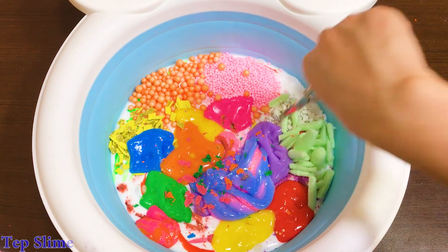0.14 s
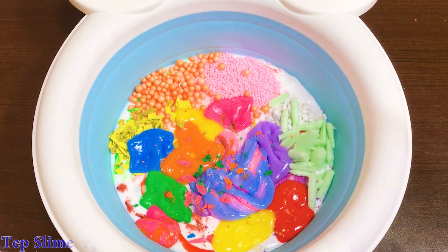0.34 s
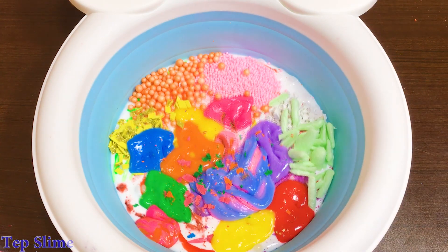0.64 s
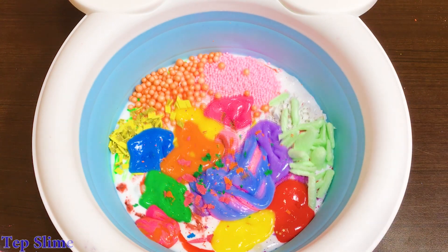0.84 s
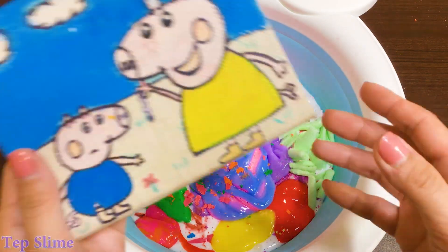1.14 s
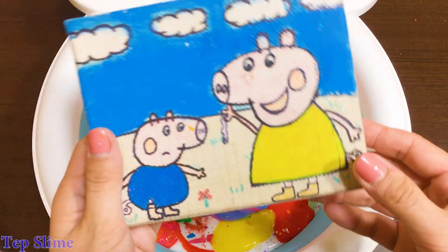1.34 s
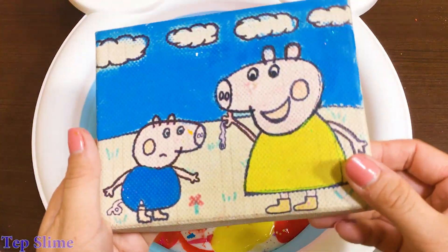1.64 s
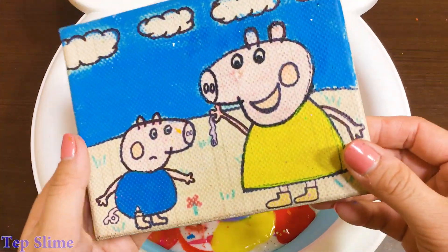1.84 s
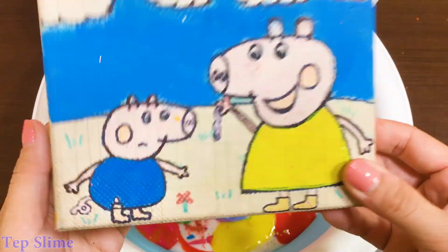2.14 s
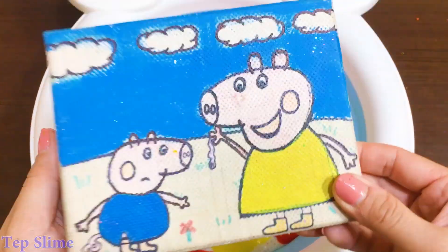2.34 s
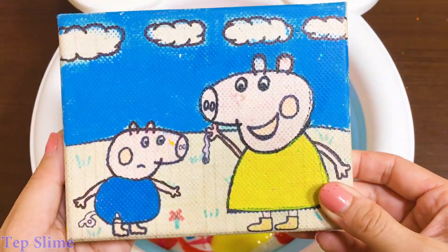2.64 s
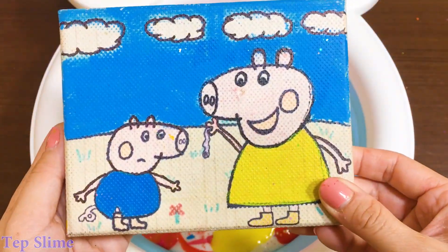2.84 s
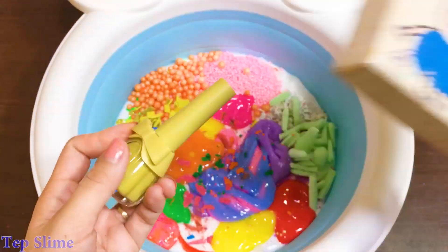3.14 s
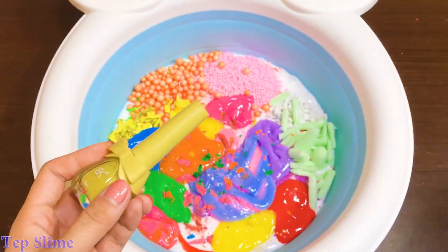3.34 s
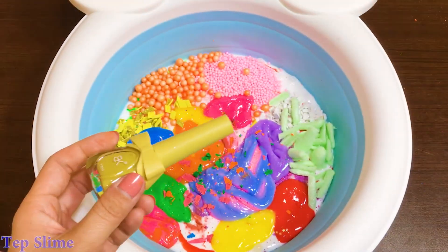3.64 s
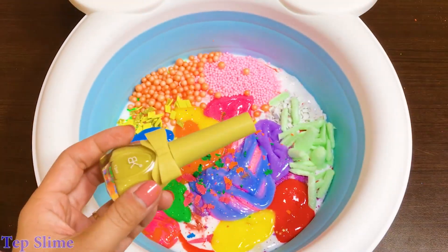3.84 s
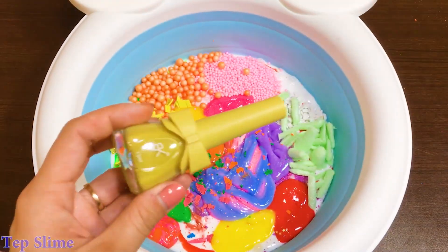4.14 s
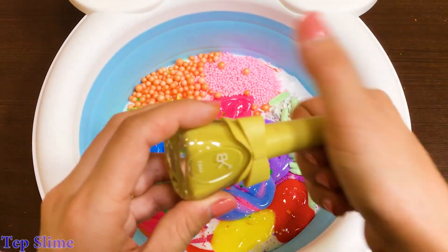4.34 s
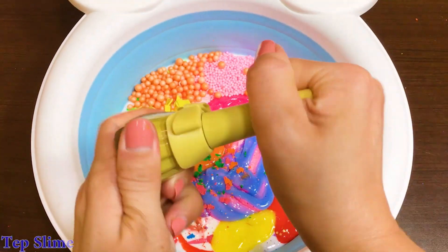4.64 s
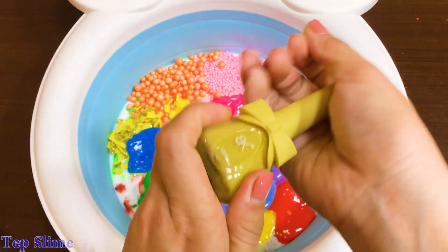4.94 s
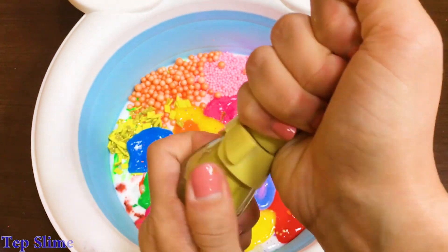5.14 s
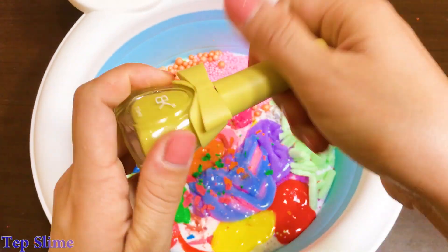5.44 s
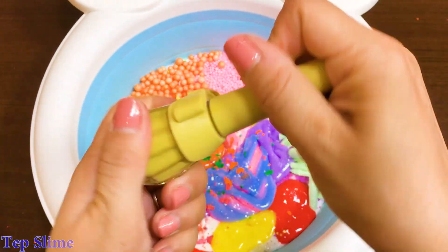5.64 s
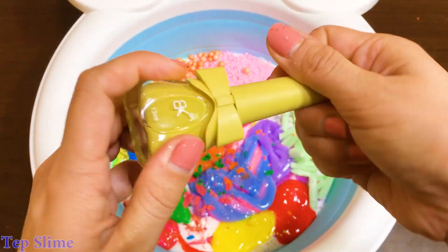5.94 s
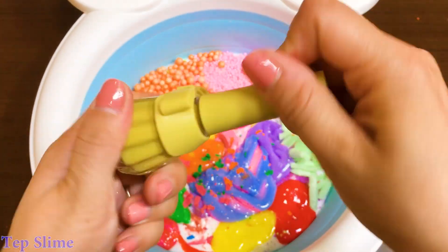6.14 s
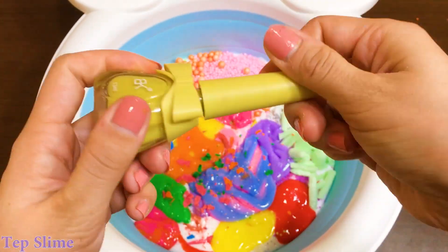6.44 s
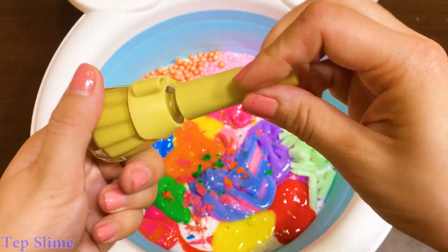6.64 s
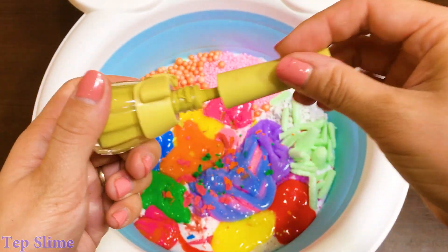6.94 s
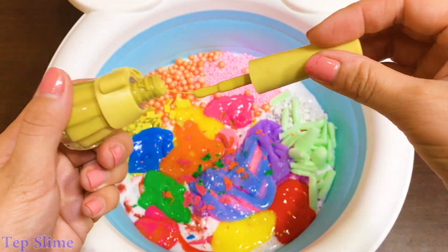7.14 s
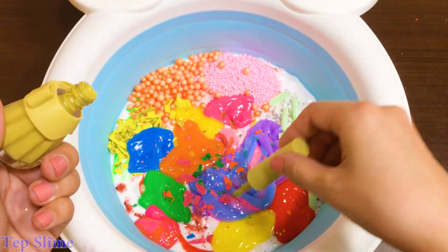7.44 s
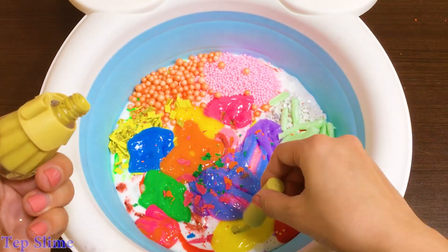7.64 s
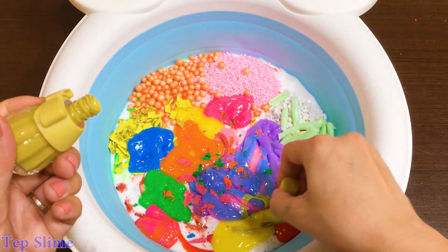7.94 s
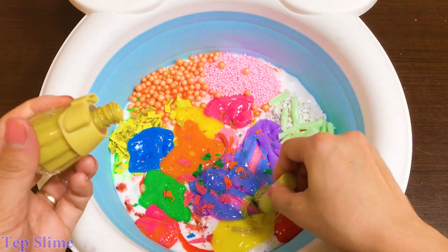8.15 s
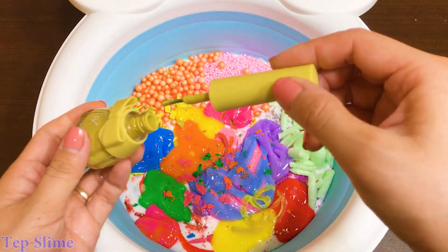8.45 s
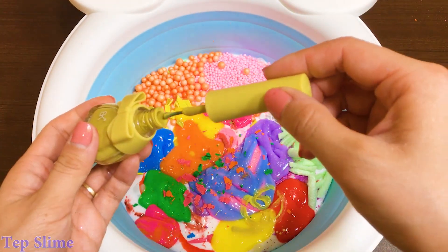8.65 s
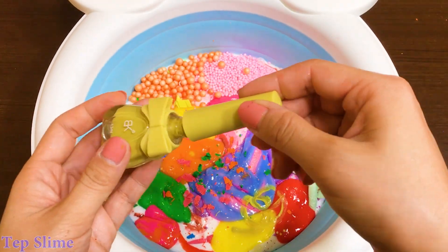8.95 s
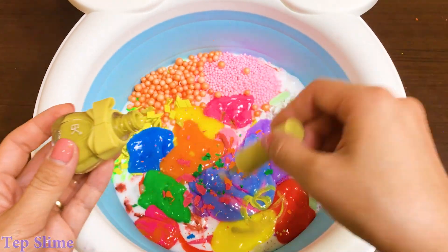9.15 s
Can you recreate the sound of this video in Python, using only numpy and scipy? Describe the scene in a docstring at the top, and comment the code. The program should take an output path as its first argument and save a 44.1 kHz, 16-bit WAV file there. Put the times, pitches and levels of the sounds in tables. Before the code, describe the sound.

In a quiet room with low hum, microphone hiss and muffled thuds from elsewhere in the house, small things are handled up close. First come faint scissor clicks, then the scuffing and tapping of a cardboard box, peaking in two sharp hollow knocks. Soft, squeaky finger friction follows as a little bottle's cap is twisted, with a few tiny ticks and finally a quick run of hard clicks.

```python
"""Close to a microphone, small scissors click: short rough rings. From 1.7 s a hollow cardboard box is turned,
rubbed and knocked: friction and blows excite its resonances, loudest near 2.7 and 2.9 s, where the blows also
boom low. From 4.8 s fingers slide on the cap of a small bottle, hissing and squeaking. At 9.2 s something small
clicks. Throughout, dull thuds come through the house over a low hum, rumble, a mid wash and microphone hiss."""
import sys
import numpy as np
from scipy import signal
from scipy.io import wavfile
from scipy.ndimage import uniform_filter1d

SR = 44100
rng = np.random.default_rng(int(sys.argv[2]) if len(sys.argv) > 2 else 0)


def to_wav(sig):
    """Store sig (one row per channel, or 1-D mono) as 16-bit WAV at the path in sys.argv[1].

    Samples outside -1..1 are clipped; the rate is SR.
    """
    pcm = np.clip(np.atleast_2d(sig), -1, 1) * 32767
    pcm = np.round(pcm).astype(np.int16)
    wavfile.write(sys.argv[1], SR, pcm.T)  # frames by channels


N = 410571

# hum level: time_s, level_db
HUM_LEVEL = [(0, -64), (.28, -78), (.36, -66.5), (1.32, -68.5), (1.5, -62), (1.62, -80), (1.8, -62),
             (2.09, -55.5), (2.2, -74), (2.38, -70), (2.44, -59.5), (2.75, -53), (3.03, -73.5), (3.47, -79),
             (3.56, -64), (3.86, -59), (4.3, -61), (4.37, -54.5), (4.58, -58.5), (4.77, -71), (5.05, -73),
             (5.11, -87), (5.2, -68), (5.41, -67.5), (5.55, -84), (5.76, -68), (6.15, -86), (6.25, -73),
             (7.11, -80), (7.52, -67.5), (8.13, -60.5), (8.6, -64), (8.68, -78), (8.9, -66.5), (9.31, -78)]
# hum pitch: time_s, pitch_hz
HUM_PITCH = [(0, 58.07), (4.6, 57.72), (5.8, 59.24), (7.4, 58.34), (7.6, 55.21), (9.31, 55.33)]
# noise spectra: freq_hz, density_db
RUMBLE_SPECTRUM = [(28, -27), (45, -7), (90, 1), (180, -1.5), (300, -3.5), (400, -7.5), (550, -22),
                   (900, -42.5)]
WASH_SPECTRUM = [(150, -26.5), (400, -3.5), (700, 1), (1200, -3), (2000, -4.5), (3500, -10.5), (6000, -22)]
HISS_SPECTRUM = [(1470, -31), (2500, -1), (2940, -8.5), (3510, -1), (4130, -1), (4930, 0), (5370, -4.5),
                 (6460, 0.5), (8330, -4.5), (10200, -2.5), (11600, -9.5), (12300, -6), (15100, -8.5),
                 (15800, -13)]
# noise levels: time_s, level_db
RUMBLE_LEVEL = [(0, -54.5), (.22, -65.5), (1.1, -69), (1.8, -65.5), (2.5, -60.5), (2.6, -64.5),
                (3.65, -60.5), (3.81, -66), (4.05, -54), (4.36, -71), (4.81, -64), (5.1, -78), (5.61, -79),
                (5.8, -68.5), (6.31, -71.5), (6.72, -78), (7.3, -74), (8.27, -71.5), (9.31, -69.5)]
WASH_LEVEL = [(0, -76.5), (.64, -71.5), (1.15, -67.5), (1.4, -62), (1.77, -68), (1.9, -69), (2.5, -73),
              (3.1, -73), (3.65, -64.5), (3.95, -72), (4.18, -63), (4.36, -69.5), (4.64, -63), (4.81, -75),
              (5.4, -80), (5.61, -73.5), (6.3, -83), (8.54, -82.5), (8.56, -74.5), (9.31, -75.5)]
HISS_LEVEL = [(0, -73), (.7, -71.5), (.72, -73.5), (4.64, -73), (4.65, -79), (8.545, -83), (8.555, -73.5),
              (9.31, -75.5)]
# small hard clicks: start_s, level_db, ring_hz, t60_s, crack_db
HARD_CLICKS = [(0.0273, -35.5, 10400, 0.0098, -3), (0.0596, -43.5, 2680, 0.012, -8),
               (.063, -39, 7700, 0.0056, -15), (.101, -54, 11000, .005, -8),
               (0.144, -48, 3960, 0.0067, -12), (.150, -51, 7100, 0.0049, 3), (.168, -57, 9000, .005, -6),
               (.187, -56, 11000, .005, -10), (0.35, -48, 9900, 0.0044, -13), (.371, -50, 9100, 0.0035, 2),
               (0.4292, -54, 10550, .02, -2), (0.452, -48.5, 1250, 0.04, -12), (.513, -55, 10900, .005, -8),
               (5.623, -54, 6000, 0.0036, -21), (6.984, -56, 9110, .004, -3.5),
               (6.995, -53.5, 4960, 0.0025, -4.5), (7.010, -49, 2383, 0.006, -16),
               (7.195, -61, 8200, .006, -1), (7.298, -55.5, 3340, 0.0096, -13.5),
               (7.310, -55, 10590, .005, -9), (8.093, -57, 2500, .005, -1),
               (8.2165, -49, 3000, 0.0023, -14), (9.168, -43.5, 603, 0.014, -7.5),
               (9.1719, -42, 6000, 0.018, -16), (9.206, -48, 1025, 0.025, -31.5),
               (9.2338, -31, 1770, 0.0062, 4), (9.239, -28, 2000, 0.0031, -14),
               (9.242, -20.5, 1620, 0.0019, -9), (9.245, -42, 8830, .006, 0), (9.248, -29, 5370, 0.0039, 1),
               (9.25, -21, 4930, 0.0074, -6), (9.2492, -34.5, 850, 0.015, -25),
               (9.253, -35.5, 5500, 0.004, -14)]
# fingers on smooth surfaces:
# full_s, rise_s, hold_s, fall_s, level_db, hiss_hz, focus (0-1), squeak_db, squeak_hz
FINGER_STROKES = [(0.034, 0.0056, .002, 0.13, -61.5, 8200, .35, -6, 2780),
                  (0.361, 0.016, .002, 0.046, -59, 9200, .05, -13, 3500),
                  (0.472, 0.094, .002, 0.035, -60, 7800, 0.1, 7.5, 3060),
                  (2.739, .004, .042, 0.011, -59, 7562, 0.2, 0, 2062),
                  (4.766, 0.055, 0.041, 0.028, -74, 8460, 0.52, 4.5, 2450),
                  (4.848, 0.048, 0.0019, 0.012, -55.5, 8650, 0.83, -14, 2130),
                  (5.08, .16, 0.031, 0.052, -65, 9000, .4, -8, 2010),
                  (5.216, .05, 0.079, 0.049, -71.5, 9140, 0.5, -9.5, 2406),
                  (5.409, 0.097, 0.066, .025, -63.5, 8180, 0.2, -10.5, 3100),
                  (5.497, 0.011, 0.015, 0.12, -57, 7900, 0.56, -18, 3500),
                  (5.623, 0.11, 0.0021, 0.064, -56, 6400, 0.44, -17, 3450),
                  (5.722, .05, 0.023, 0.02, -60.5, 10360, .15, -4, 3340),
                  (5.942, .025, .055, .11, -71.5, 8300, 0.37, -4, 2470),
                  (6.176, 0.081, 0.0019, .1, -66, 7510, 0.24, -8, 3395),
                  (6.247, .04, 0.077, .05, -68, 9750, .42, -24, 3300),
                  (6.657, .12, 0.0019, .045, -70, 7740, 0.18, -9, 3430),
                  (6.762, 0.14, 0.0095, 0.11, -70.5, 9620, 0.45, -25, 3307),
                  (7.006, 0.094, .002, .075, -67, 11040, 0.26, 4, 2620),
                  (7.087, 0.066, 0.023, .03, -78, 9200, .3, -14, 2900),
                  (7.309, 0.057, 0.0046, 0.019, -75, 10300, .4, 4, 3390),
                  (8.219, 0.0076, .002, 0.017, -65, 9280, 0.01, -3, 2530),
                  (8.575, 0.029, .002, 0.033, -64.5, 8490, 0.18, -9, 2785)]
# thuds through table and house, and at 2.73 and 2.912 s the low boom of the two big box knocks: start_s,
# level_db, boom_hz, rise_s, t60_s, rattle_db
THUDS = [(.035, -52, 228, 0.01, 0.41, -19), (.463, -46.5, 180, 0.0061, 0.14, -9),
         (.708, -46, 203.4, 0.0028, .33, -18.5), (1.397, -54, 254, 0.0097, .37, -8),
         (1.45, -55.5, 171.6, 0.01, 0.3, -23.5), (2.73, -40, 84.83, .004, .25, -14),
         (2.912, -42, 84.46, .004, .25, -7.5), (3.455, -42.5, 214, 0.022, 0.25, -18.5),
         (3.984, -40.5, 287.5, 0.0018, 0.45, -14.5), (4.239, -42, 117.3, 0.0029, .4, -16),
         (4.779, -56, 287.4, 0.0053, .37, -3.5), (5.559, -69.5, 330, 0.025, 1.26, -9),
         (5.817, -44.5, 283.5, 0.0014, 0.16, -10), (5.83, -46.5, 190.3, 0.012, 0.36, -19),
         (6.13, -66, 165.9, 0.026, 1.8, -27), (6.19, -58.5, 215.5, 0.0093, 0.84, -10.5),
         (7.548, -62, 177.8, .0078, 0.47, -5), (8.092, -57.5, 268.8, 0.003, 0.25, -2.5),
         (8.115, -55, 209, 0.0094, 0.55, -10), (8.283, -57.5, 174.9, 0.0084, .37, -15),
         (8.50, -61, 286.6, .0049, 0.51, -15), (8.55, -54.5, 198.4, .008, 0.35, -25.5),
         (9.25, -57, 324, .006, 0.24, -21)]
# hands on cardboard: full_s, rise_s, hold_s, fall_s, level_db, bright_db, upper_hz
BOX_STROKES = [(0.413, 0.02, .002, 0.025, -57.5, -17, 3720), (1.719, 0.0049, .002, 0.031, -41, -31, 3560),
               (1.76, 0.054, 0.012, 0.33, -54, -4, 3850), (1.874, .035, 0.044, .03, -62.5, -3.5, 3900),
               (1.98, 0.044, 0.042, .045, -52, -21, 3620), (2.323, 0.081, 0.015, 0.32, -60, 2, 3700),
               (2.337, 0.016, 0.0022, 0.024, -47.5, -21, 3770), (2.44, 0.0035, .002, 0.082, -57.5, 2, 3700),
               (2.512, 0.087, .002, 0.031, -56, -4, 3730), (2.652, 0.041, .002, 0.024, -55, 6, 4150),
               (3.218, .04, .088, .008, -54.5, -15, 3750), (3.382, .04, 0.0023, 0.016, -53, 8.5, 3400),
               (3.661, .03, 0.036, .03, -71.5, 16.5, 3720), (4.014, .006, .002, 0.41, -60, 3.5, 3500),
               (4.148, .01, 0.068, .02, -68, 0, 3550), (2.589, .01, .01, .02, -68, 4.5, 4202)]
# resonances of rubbed cardboard: centre_hz, width_hz, gain_db
CARDBOARD_BANDS = [(344, 220, -6), (805, 250, -9), (1303, 340, -0.5), (1690, 530, -5), (2500, 900, -8)]
# blows on the box, a row per bounce: start_s, level_db, contact_ms, spot_hz, crack_db
BOX_KNOCKS = [(1.7158, -45, 0.19, 2000, -28), (1.721, -49, 0.16, 1620, -37), (1.732, -44, 0.24, 1600, -33),
              (2.312, -52, 0.67, 350, -30), (2.3355, -39.5, 1, 398, -28), (2.4345, -33.5, 1, 432, -22),
              (2.481, -44.5, 0.18, 1500, -11), (2.50, -43, 0.94, 500, -37), (2.515, -44.5, .8, 350, -26),
              (2.708, -43, .4, 1000, -28), (2.7255, -13, 0.14, 3400, -23.5), (2.7288, -2, 0.27, 1050, -26),
              (2.7318, -26.5, 1, 605, -22), (2.757, -35, .2, 3600, -19.5), (2.909, -6, 0.085, 2080, -19),
              (2.9113, -2.5, 0.93, 597, -29), (2.916, -8.5, 0.41, 496, -37.5), (2.952, -19, .3, 900, -30),
              (2.9675, -24, 0.56, 700, -35), (2.977, -47, .15, 3000, -24), (3.248, -41, 0.15, 2470, -20),
              (3.299, -43, 0.24, 1500, -30), (3.9835, -27.5, 0.069, 2230, -7), (4.004, -36, .2, 1800, -28),
              (4.147, -43, 0.2, 1500, -28), (4.217, -41.5, 0.15, 2070, -29), (4.232, -28, .12, 1300, -20),
              (4.256, -36.5, 0.3, 1600, -30), (4.30, -55.5, .3, 1100, -23)]
# modes of the struck box: mode_hz, mode_db, t60_s
BOX_MODES = [(306, -2, 0.054), (430, -7.5, 0.012), (670, 1, 0.018), (825, -4.5, 0.012), (1073, -2.5, 0.014),
             (1273, 2.5, 0.007), (1635, -7, .02), (1900.4, -7.5, 0.014), (2200, -5, 0.015),
             (2580, -4.5, 0.0063), (2930, -14.5, .015), (3620, -3.5, .009), (4200, -14, 0.013),
             (4830, -14.5, .008), (6930, -18.5, 0.0021), (10000, -21, .003)]
# rubbing tones, hollow on the box, squeaky on the bottle:
# full_s, rise_s, hold_s, fall_s, level_db, from_hz, to_hz
SQUEAK_STROKES = [(1.722, 0.0041, 0.013, 0.047, -47, 1590, 1450),
                  (1.973, 0.0054, 0.058, 0.029, -58.5, 1290, 1280), (4.16, .01, .06, .01, -64, 1300, 1200),
                  (4.24, 0.0058, .07, 0.064, -52, 1130, 1060), (4.761, .03, .04, .02, -75, 2850, 2700),
                  (5.003, 0.038, 0.13, .02, -77.5, 1990, 1950),
                  (5.409, 0.027, 0.055, 0.017, -67.5, 4300, 2200), (5.494, 0.012, .1, .04, -71, 5860, 5900),
                  (5.717, 0.021, 0.02, 0.0092, -67, 2620, 4830),
                  (5.958, .02, 0.053, 0.035, -76, 2500, 2470), (6.98, 0.019, 0.014, .015, -73, 3500, 3294),
                  (7.298, 0.0098, 0.0073, .015, -72.5, 3490, 3400)]
# room decay: freq_hz, t60_s
ROOM_DECAY = [(150, 0.12), (400, 0.32), (1000, 0.19), (2500, 0.16), (6000, 0.2), (12000, 0.071)]


def gain_of(db):
    """Decibels to amplitude."""
    return 10 ** (np.asarray(db) / 20)


def unit_rms(x):
    """Scales to rms 1."""
    return x / np.sqrt(np.mean(x ** 2) + 1e-20)


def over_freq(table, hz):
    """Table value over log frequency."""
    table_hz, values = np.transpose(table)
    return np.interp(np.log(hz + 1), np.log(table_hz + 1), values)


def over_time(table):
    """Table value at every sample."""
    time_s, values = np.transpose(table)
    return np.interp(np.arange(N) / SR, time_s, values)


def add(mix, start_s, sound):
    """Mixes a sound in at start_s."""
    part = mix[round(start_s * SR):][:len(sound)]
    part += sound[:len(part)]


def band(x, hz, width_hz):
    """Two passes of one resonance, rms 1; hz may glide."""
    carrier = np.exp(2j * np.pi * np.cumsum(hz * np.ones(len(x))) / SR)
    pole = np.exp(-np.pi * width_hz / SR)
    for _ in range(2):
        baseband = signal.lfilter([1 - pole], [1, -pole], x / carrier + 1e-18)
        x = 2 * (carrier * baseband).real
    return unit_rms(x)


def patchy_noise(spectrum, patch_db, frame):
    """Shaped noise with drifting patches, rms 1."""
    hz = np.fft.rfftfreq(frame, 1 / SR)
    real, imag, patches = rng.standard_normal((4 * N // frame + 5, len(hz), 3)).T
    patches = uniform_filter1d(patches, size=8, axis=0)
    patches = unit_rms(uniform_filter1d(patches, size=8, axis=1))
    bins = (real + 1j * imag) * gain_of(over_freq(spectrum, hz)[:, None] + patch_db * patches)
    return unit_rms(signal.istft(bins, nperseg=frame, noverlap=3 * frame // 4)[1][:N])


def friction(count, lump_db):
    """Dense tiny slips whose strength comes in lumps."""
    lumps = unit_rms(uniform_filter1d(rng.standard_normal(count), size=120))
    slips = unit_rms(rng.standard_normal(count) * gain_of(lump_db * lumps))
    return slips * signal.windows.tukey(count, 120 / count)


def stroke(full_s, rise_s, hold_s, fall_s, level_db, floor_db=-26.5):
    """Start time and gain of a stroke: swell until full_s, hold, fade."""
    length_s = rise_s + hold_s + fall_s
    t = np.arange(0, length_s, 1 / SR)
    shape_db = np.interp(t, [0, rise_s, rise_s + hold_s, length_s], [floor_db, 0, 0, floor_db])
    return full_s - rise_s, gain_of(level_db + shape_db)


def hum():
    """A low wavering tone in narrow noise; it comes and goes."""
    pitch_hz = over_time(HUM_PITCH)
    tone = np.sin(2 * np.pi * np.cumsum(pitch_hz) / SR)
    flutter = band(rng.standard_normal(N), pitch_hz, 15)
    return gain_of(over_time(HUM_LEVEL)) * (1.5 * tone + 0.78 * flutter)


def rumble():
    """Low noise that rises and sinks."""
    return gain_of(over_time(RUMBLE_LEVEL)) * patchy_noise(RUMBLE_SPECTRUM, patch_db=1.0, frame=2048)


def wash():
    """Midrange noise that swells and drops."""
    return gain_of(over_time(WASH_LEVEL)) * patchy_noise(WASH_SPECTRUM, patch_db=1.5, frame=512)


def microphone_hiss():
    """High noise whose level steps a few times."""
    return gain_of(over_time(HISS_LEVEL)) * patchy_noise(HISS_SPECTRUM, patch_db=2.5, frame=512)


def click(level_db, ring_hz, t60_s, crack_db):
    """One short ring that starts rough, on a wide crack."""
    t = np.arange(SR // 20) / SR
    grit, crack = rng.standard_normal((2, len(t)))
    ring = 0.9 * np.sin(2 * np.pi * ring_hz * t)
    rough = 0.81 * band(grit, ring_hz, 1.54 * ring_hz) + gain_of(crack_db) * crack
    rough *= gain_of(-60 * t / 0.032)
    attack = 1 - np.exp(-t / 0.0001)
    return gain_of(level_db - 60 * t / t60_s) * (ring + rough) * attack


def finger_rub(full_s, rise_s, hold_s, fall_s, level_db, hiss_hz, focus, squeak_db, squeak_hz):
    """Fine friction: hiss, wide or focused by the grip, and a fuzzy lower squeak."""
    start_s, gain = stroke(full_s, rise_s, hold_s, fall_s, level_db)
    slips = friction(len(gain), lump_db=2.0)
    hiss = focus * band(slips, hiss_hz, 2800) + (1 - focus) * band(slips, 10300, 13500)
    fuzz = gain_of(squeak_db - 11.0) * band(slips, squeak_hz, 1300)
    return start_s, gain * (hiss + fuzz)


def thud(level_db, boom_hz, rise_s, t60_s, rattle_db, rattle_hz=735):
    """A muffled blow: a wobbling boom builds up over a shorter dull rattle."""
    t = np.arange(SR // 2) / SR
    wobble, body, grit = rng.standard_normal((3, len(t)))
    boom = np.sin(2 * np.pi * boom_hz * t) + 0.4 * band(wobble, boom_hz, 57) + 0.4 * band(body, 223, 228)
    rattle = band(grit, rattle_hz, 600) + 0.37 * band(grit, rattle_hz, 1200)
    rattle *= gain_of(rattle_db - 60 * t / 0.8)
    fade = gain_of(-60 * t / t60_s)
    swell = fade * (1 - np.exp(-(t / rise_s) ** 2))
    return gain_of(level_db) * (boom * swell / swell.max() + rattle * fade)


def box_rub(full_s, rise_s, hold_s, fall_s, level_db, bright_db, upper_hz):
    """Friction through cardboard resonances; bright_db sets a quick stroke's upper band and fizz."""
    start_s, gain = stroke(full_s, rise_s, hold_s, fall_s, level_db - 3.5)
    slips = friction(len(gain), lump_db=1.5)
    body = sum(gain_of(db) * band(slips, hz, width_hz) for hz, width_hz, db in CARDBOARD_BANDS)
    upper = 0.75 * band(slips, upper_hz, 1300) + 0.6 * band(slips, 6000, 7200)
    return start_s, gain * (body + gain_of(bright_db) * upper)


def box_knock(level_db, contact_ms, spot_hz, crack_db):
    """A blow cracks and rings the box, favouring modes near spot_hz; long contact dulls it."""
    t = np.arange(SR // 6) / SR
    mode_hz, mode_db, t60_s = np.transpose(BOX_MODES)[:, :, None]
    scatter_db = rng.normal(0, 2.0, mode_hz.shape)
    detune = rng.normal(0, 0.02, mode_hz.shape)
    struck_db = mode_db + scatter_db - 2.2 * np.log2(mode_hz / spot_hz) ** 2
    envelopes = gain_of(struck_db - 60 * t / t60_s) / (1 + (mode_hz * contact_ms / 1000) ** 2)
    polarity = (-1.) ** np.arange(len(BOX_MODES))[:, None]
    ring = (polarity * envelopes * np.sin(2 * np.pi * mode_hz * (1 + detune) * t)).sum(0)
    ring *= 1 - np.exp(-(1000 * t / contact_ms) ** 2)  # force builds over the contact
    crack = band(rng.standard_normal(len(t)), 3300, 5100) * gain_of(crack_db - 60 * t / 0.024)
    return gain_of(level_db) * (ring / abs(ring).max() + crack)


def squeak(full_s, rise_s, hold_s, fall_s, level_db, from_hz, to_hz):
    """Friction through one narrow resonance that glides as the grip changes."""
    start_s, gain = stroke(full_s, rise_s, hold_s, fall_s, level_db)
    slips = friction(len(gain), lump_db=3.5)
    glide_hz = np.linspace(from_hz, to_hz, len(gain))
    return start_s, gain * band(slips, glide_hz, width_hz=0.2 * from_hz)


def room(x):
    """Sparse reflections of random sign; each band decays at its own rate."""
    taps = np.zeros(SR // 2)
    slots = np.arange(160, len(taps) - 20, 20)
    taps[slots + rng.integers(0, 20, len(slots))] = rng.choice([-1., 1.], len(slots))
    hz, t, bins = signal.stft(taps, SR, nperseg=256)
    decay = gain_of(-60 * t / over_freq(ROOM_DECAY, hz)[:, None])
    tail = signal.istft(bins * decay, SR, nperseg=256)[1]
    return signal.fftconvolve(x, tail / np.linalg.norm(tail))[:N]


def scene():
    """Near sounds and their reverb over thuds and background; mono."""
    near = np.zeros(N)
    far = hum() + rumble() + wash() + microphone_hiss()
    for start_s, *row in BOX_KNOCKS:
        add(near, start_s, box_knock(*row))
    for start_s, *row in HARD_CLICKS:
        add(near, start_s, click(*row))
    for row in BOX_STROKES:
        add(near, *box_rub(*row))
    for row in FINGER_STROKES:
        add(near, *finger_rub(*row))
    for row in SQUEAK_STROKES:
        add(near, *squeak(*row))
    for start_s, *row in THUDS:
        add(far, start_s, thud(*row))
    bass_cut = signal.butter(1, 120, "high", fs=SR, output="sos")  # small things radiate little bass
    near = signal.sosfilt(bass_cut, near)
    return (near + gain_of(-17.0) * room(near) + far)[None]


def record(dry, low_hz=35, high_hz=15900):
    """Microphone bass roll-off, then the band limit."""
    thin = signal.sosfilt(signal.butter(2, low_hz, "high", fs=SR, output="sos"), dry)
    lowpass = signal.firwin(511, high_hz, window=("kaiser", 9), fs=SR)
    return signal.oaconvolve(thin, lowpass[None], "same")


dry = scene()
out = record(dry)
to_wav(out)
```